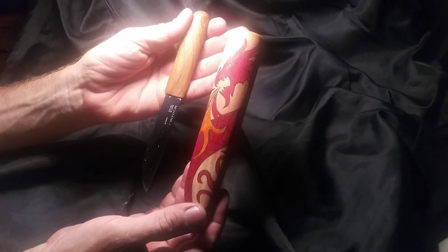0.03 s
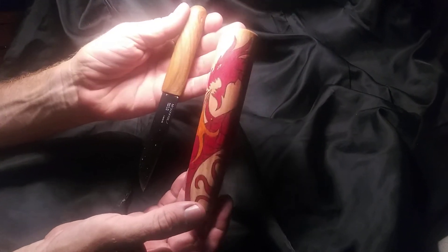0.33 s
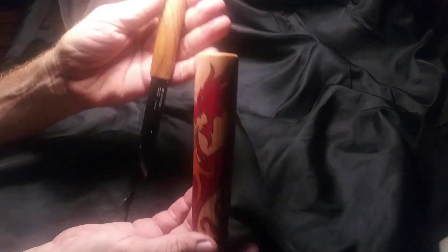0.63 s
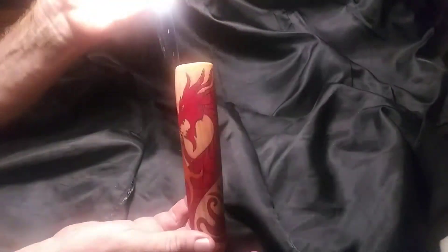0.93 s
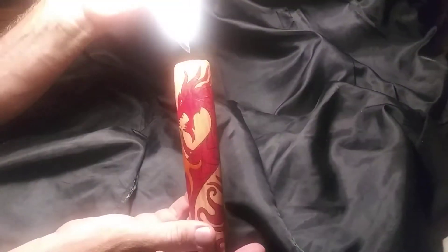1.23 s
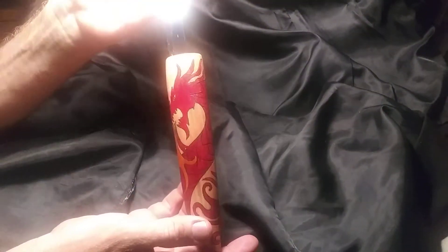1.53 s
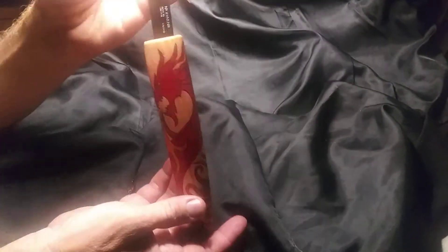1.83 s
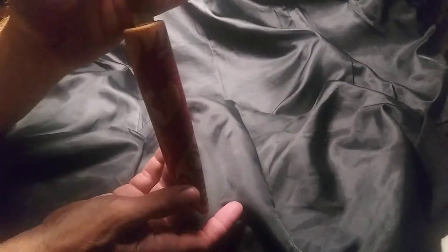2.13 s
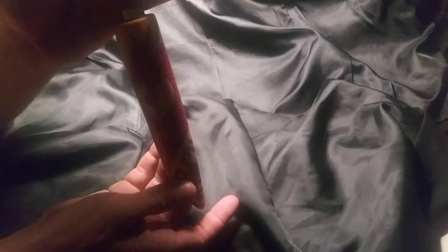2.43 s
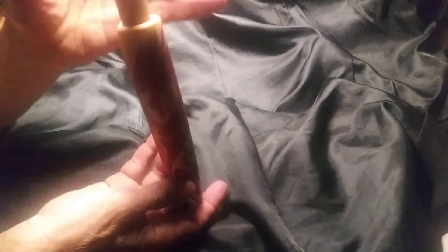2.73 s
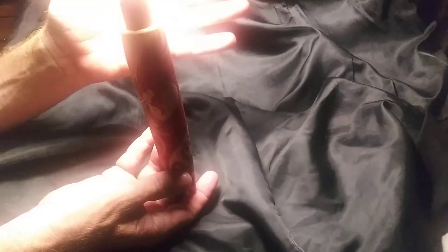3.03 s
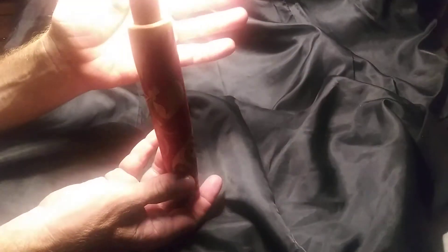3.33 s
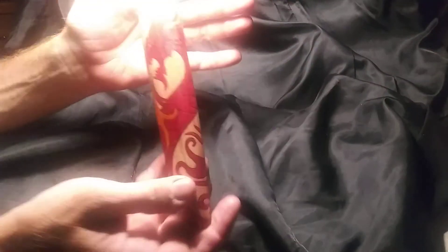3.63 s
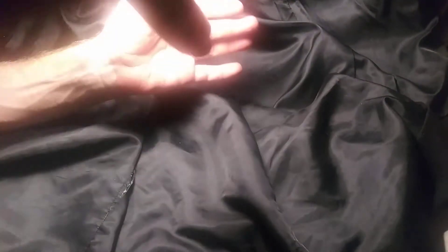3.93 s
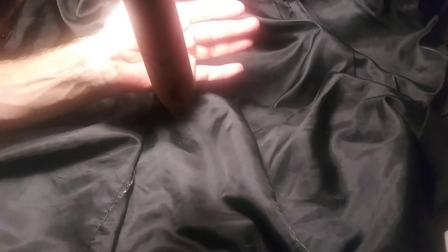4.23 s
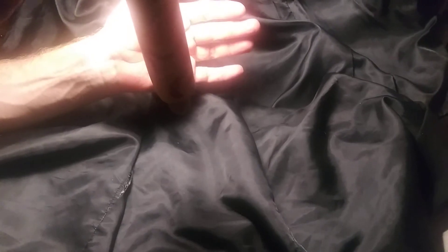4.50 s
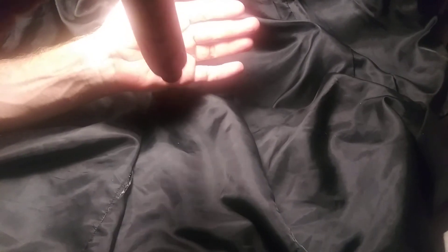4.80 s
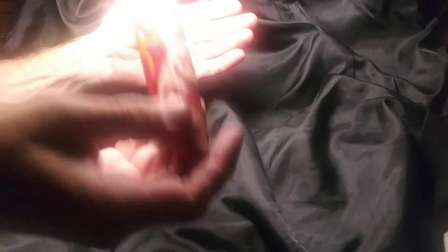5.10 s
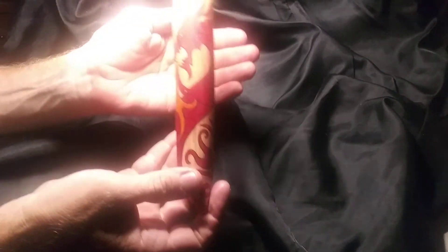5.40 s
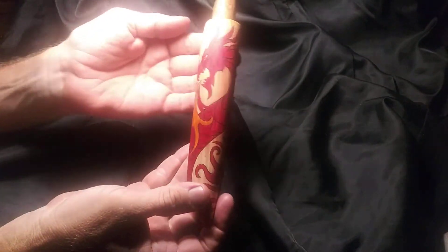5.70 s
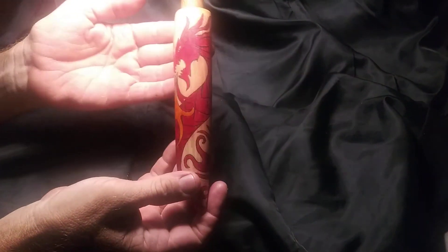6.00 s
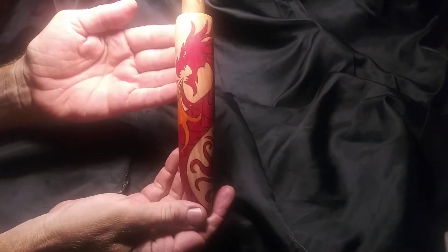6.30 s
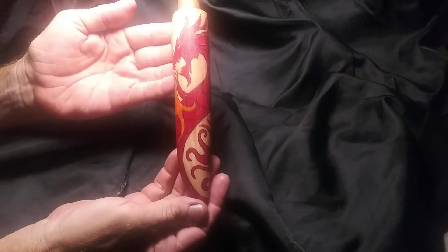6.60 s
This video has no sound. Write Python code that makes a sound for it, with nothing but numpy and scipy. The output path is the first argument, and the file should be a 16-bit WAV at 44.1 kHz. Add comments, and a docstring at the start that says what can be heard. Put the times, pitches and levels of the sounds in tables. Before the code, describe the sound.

Over a low electric hum, a blade ticks, rattles and clacks into a wooden sheath, followed by a faint skin squeak.

```python
"""A low electric hum fills a small room, with a few faint rubs and taps. A knife goes into a wooden sheath:
the blade ticks against the mouth, rattles down between the walls, and the handle seats with a loud clack.
Each knock is a few dying tones plus a crack of noise; each rub is noise gathered around a few pitches.
Later a hand shifts its grip, with a soft rustle and a faint rising squeak as skin sticks and slips."""
import sys
import numpy as np
from scipy import signal
from scipy.fft import rfft, irfft, next_fast_len
from scipy.io import wavfile
from scipy.ndimage import uniform_filter1d

SR = 44100
rng = np.random.default_rng(int(sys.argv[2]) if len(sys.argv) > 2 else 0)


def store_wav(level_fs):
    """Save 16-bit WAV to argv[1]."""
    pcm = np.round(np.clip(np.atleast_2d(level_fs), -1, 1) * 32767)
    wavfile.write(sys.argv[1], SR, pcm.T.astype(np.int16))


N = 297675
TIME = np.arange(N) / SR

# The hum of the mains and a motor. Each row: pitch in Hz, level in dB.
HUM_TONES = [(39.8, -72), (59.9, -55), (119.9, -60.5), (159.5, -66.5), (219.5, -86.5), (360, -91.5),
             (480, -92.5)]
# The tone colours of the rumble and the hiss. Each row: frequency in Hz, relative level in dB.
RUMBLE_COLOUR = [(15, -24), (30, -17), (50, -7.5), (75, 0), (105, 2), (135, 0), (175, -8), (205, -17.5),
                 (260, -24.5), (400, -40.5), (900, -80)]
HISS_COLOUR = [(100, -19.5), (250, -5), (400, -5), (800, -8.5), (1500, -10), (3000, -13), (7000, -16.5),
               (11000, -17.5), (13500, -16.5), (15500, -16.5)]
# Brief faint pitched sounds: small rubs, a light tap, a low bump, a knock's high after-ring.
# Each row: start and length in seconds, pitch and width in Hz, level in dB.
FAINT_SOUNDS = [(0.459, .045, 3020, 200, -77), (.475, 0.072, 5100, 250, -83), (.833, .04, 1267, 130, -66),
                (0.887, .03, 2000, 300, -76), (1.605, 0.046, 3100, 120, -78), (1.868, .14, 3490, 40, -76),
                (1.92, 0.24, 734, 200, -73.5), (1.939, 0.15, 5500, 700, -79),
                (2.011, 0.089, 6700, 400, -75.5), (2.027, 0.21, 3220, 150, -80),
                (2.877, 0.11, 1750, 700, -70), (3.742, .06, 6920, 700, -74), (4.108, .042, 333, 80, -73.5),
                (5.51, .06, 3250, 92, -81)]
# Knife meeting sheath. Each row: start in seconds, strength in dB, part struck, contact time in ms,
# bass cutoff in Hz, level in dB of the crack added to the ring.
KNOCKS = [ (1.6526, -38, "mouth", .8, 1340, -10), (1.689, -48, "mouth", 2.1, 1100, -22),
          (2.0185, -40.5, "mouth", 1.1, 300, -18.5), (2.0420, -47, "mouth", 1.8, 500, -47.5),
          (2.2841, -21, "hollow", 1.24, 480, -24), (2.6586, -26, "wall", 0.54, 430, -20.5),
          (2.6762, -23.5, "wall", 0.71, 363, -8.5), (2.6835, -26.5, "wall", 0.54, 710, -12),
          (2.693, -30, "wall", 1.8, 400, -6), (2.7006, -30, "wall", .45, 600, -10),
          (2.7256, -16.5, "blade", 0.77, 350, -9.5), (2.728, -19.5, "blade", 1.7, 500, -17),
          (2.7494, -37.5, "wall", .8, 594, -5.5), (2.7581, -24, "blade", 0.54, 500, -8),
          (2.7590, -24.5, "seat", .6, 330, -15), (2.7718, -22.5, "seat", 1, 377, -12),
          (2.7763, -16.5, "seat", 0.29, 600, -8), (2.7786, -2.5, "seat", 1.5, 340, -17.5)]
# The tones of each part: the sheath's rim ("mouth"), its thin side ("wall"), the half-empty sheath
# ("hollow"), the wedged steel ("blade"), and handle and sheath meeting as one ("seat").
# Each row: pitch in Hz, relative level in dB, seconds to fade by 60 dB.
PART_TONES = { "mouth": [(426, -8, 0.021), (640.7, -3, 0.026), (854, -6, 0.021), (1230, -3, 0.022),
              (1650, -4.5, 0.017), (2660, -17, 0.088), (3133, -4, 0.026), (3670, -23, 0.045),
              (6550, -14.5, 0.039)], "wall": [(480, -12, 0.037), (703, -5.5, .025), (1060, -11.5, 0.045),
              (1268, -9.5, 0.026), (1436, -3.5, 0.018), (1745, -5, 0.019), (2322, -16, 0.018),
              (2630, -17, 0.11), (3080, -0.5, .024), (3466, -15, .015), (4800, -23.5, 0.014),
              (5355, -20, 0.036), (6356, -19.5, 0.02), (7100, -20.5, .025)],
              "hollow": [(519.4, -24.5, 0.028), (953, -10.5, .035), (1037, -14, .04), (1350, -14, .03),
              (1695, -5, 0.033), (1907, 1, 0.01), (2040, -7, .012), (2560, -21, .12), (2850, -19.5, .07),
              (3080, -25.5, 0.083), (3830, -23, 0.089), (5250, -30, 0.066), (6433, -34, 0.068)],
              "blade": [(735, -8.5, 0.017), (1254, -17, 0.018), (1440, -14, 0.022), (2357.6, 0, .022),
              (2914, -14, .03), (3000, -9, 0.014), (3750, -11.5, 0.017), (4060, -18, .1),
              (4769, -15.5, 0.02), (5397, -24.5, 0.033), (7300, -21, 0.017)], "seat": [(490, -20.5, 0.014),
              (571.5, -16, 0.017), (1476, -8, 0.023), (1836, -0.5, 0.01598), (2221, -15.5, .02),
              (2900, -19.5, 0.02), (3320, -18, 0.011), (4014, -19, 0.008), (4470, -23, 0.022),
              (4888, -16.5, 0.01), (5624, -25.5, 0.011), (6860, -25.5, 0.014), (7500, -23, 0.014)]}
# The splintery crack of a knock, and the noise it sprays into the room.
# Each row: frequency in Hz, relative level in dB.
CRACK_COLOUR = [(150, -34), (265, -26), (320, 2), (500, -2.5), (1500, 8), (4000, -0.5), (7400, -8.5),
                (8500, -13), (11000, -21.5), (13000, -15.5), (16000, -19.5)]
SPRAY_COLOUR = [(150, -24), (260, -14.5), (320, 0.5), (480, -2), (1000, 0.5), (1600, 2.5), (2600, -1),
                (4000, -13), (7300, -16.5), (9000, -20.5), (16000, -25)]
# How bright a knock is. Each entry: part, treble cutoff in Hz when the crack is at PLAIN_CRACK_DB.
TREBLE_CUTOFF_HZ = {"mouth": 7300, "wall": 5300, "hollow": 8000, "blade": 7000, "seat": 12100}
PLAIN_CRACK_DB, CRACK_DB_PER_OCTAVE = -12, 12.5
# Rubbing strokes. Each row: start in seconds, seconds until it lets go, level in dB, kind of stroke.
STROKES = [ (2.287, 0.12, -60.5, "drag"), (2.654, .12, -45, "slide"), (5.265, 0.098, -70, "grip"),
           (5.43, .04, -67.5, "grip"), (5.462, 0.085, -65, "grip"), (5.561, 0.042, -62, "grip"),
           (5.697, 0.12, -62, "brush")]
# What each stroke stirs: steel on the mouth ("drag"), steel down the inside ("slide"), fingers creeping
# on wood ("grip"), the palm brushing off ("brush"). Each row: pitch and width in Hz, relative level in dB.
STROKE_PEAKS = { "drag": [(1170, 550, -10), (1750, 320, -9), (2447, 55, 7), (2640, 170, -19),
                (3760, 130, -10)], "slide": [(343, 45, 0), (500.6, 130, -5), (686.7, 55, 0),
                (1084.5, 211, -1.5), (1720, 190, 2), (2490, 410, -3.5), (3300, 330, -11.5),
                (5594, 1200, -23.5)], "grip": [(743, 61, -4.5), (884, 81, 5), (1080, 160, -14)],
                "brush": [(737, 110, 1), (1056, 90, -2.5), (1421, 120, 1), (1867, 120, -4),
                (2140, 150, -8.5), (2458, 94, 0), (3170, 146, -17), (6880, 1000, -25.5), (8500, 560, -29)]}
# Patches of squeaking skin. Each row: start and length in seconds, pitch as a multiple of the shared
# glide, level in dB, width in Hz.
SKIN_PATCHES = [(5.06, 0.411, 0.98, -74.5, 60.2), (5.17, .22, 1.14, -80, 70), (5.32, .13, .84, -82, 80.2),
                (5.428, .16, 1.02, -72, 240)]
# Echoes off nearby surfaces. Each row: delay in seconds, gain (a minus flips the wave).
NEAR_ECHOES = [(.0031, 0.12), (.0088, -0.072), (0.013, 0.042), (0.016, -.05), (.0215, 0.057)]
# How long the room rings. Each row: frequency in Hz, seconds to fade by 60 dB.
ROOM_FADE = [(250, .4), (700, .42), (1800, .41), (3500, .42), (7000, .46), (14000, .35)]
# The room's tone colour. Each row: frequency in Hz, relative level in dB.
ROOM_COLOUR = [(200, 0), (350, 2), (700, 1), (1800, 0), (3000, 0), (7000, 1), (14000, -1)]


def gain_of(db):
    """Turns decibels into a number to multiply by."""
    return 10 ** (np.asarray(db) / 20)


def evened(x):
    """Scales a signal to an average (rms) level of 1."""
    return x / np.sqrt(np.mean(x ** 2) + 1e-20)


def read(points, hz):
    """Reads between the rows of a frequency table, with octaves evenly spaced."""
    f, value = np.transpose(points)
    return np.interp(np.log(hz + 1), np.log(f + 1), value)


def add(mix, s, sound):
    """Mixes a sound in, starting at s seconds."""
    part = mix[round(s * SR):][:len(sound)]
    part += sound[:len(part)]


def noise(colour_db, size):
    """Noise of level 1, shaped by a function that gives dB for each frequency."""
    padded = next_fast_len(size, real=True)
    white = rfft(rng.standard_normal(padded))
    gains = gain_of(colour_db(np.fft.rfftfreq(padded, 1 / SR)))
    return evened(irfft(white * gains, padded)[:size])


def resonant_noise(peaks, size):
    """Noise gathered around peaks, each a pitch in Hz, a width in Hz and a level in dB."""
    def colour_db(f):
        return 20 * np.log10(sum(gain_of(db) / (1 + (2 * (f - hz) / width) ** 2)
                                 for hz, width, db in peaks))
    return noise(colour_db, size)


def drift(rate_hz):
    """A random wobble of typical size 1, mostly slower than rate_hz."""
    return noise(lambda f: -20 * np.log10(1 + (f / rate_hz) ** 4), N)


def background(hum_waver=0.045, rumble_db=-63, swell_db=1.55, hiss_db=-75):
    """The mains and a motor hum over a thin hiss and a rumble that swells and sinks by chance."""
    hum = sum(gain_of(db) * evened(np.sin(2 * np.pi * (hz * TIME + rng.random())))
              for hz, db in HUM_TONES)
    rumble = gain_of(rumble_db + swell_db * drift(rate_hz=1.4)) * noise(lambda f: read(RUMBLE_COLOUR, f), N)
    hiss = gain_of(hiss_db) * noise(lambda f: read(HISS_COLOUR, f), N)
    return hum * (1 + hum_waver * drift(rate_hz=2.6)) + rumble + hiss


def faint_sounds(skew=0.57):
    """Brief faint sounds, each a band of noise around one pitch that rises quickly and dies slowly."""
    out = np.zeros(N)
    for start, length, hz, width, db in FAINT_SOUNDS:
        size = round(length * SR)
        arch = np.sin(np.pi * np.linspace(0, 1, size) ** skew)  # a lower skew peaks earlier
        band = evened(resonant_noise([(hz, width, 0)], SR // 4)[:size])
        add(out, start, gain_of(db) * band * arch)
    return out


def knock(part, contact_ms, low_hz, high_hz, crack_db, room_db, crack_s=.003, spray_db=-1, tone_db=-5):
    """Tones swell while two parts press together, then ring out under a short crack."""
    t = np.arange(SR // 5) / SR
    contact = np.exp(-(t * 1000 / contact_ms) ** 2)
    hz, levels_db, fade_s = np.transpose(PART_TONES[part])[:, :, None]
    fades = gain_of(levels_db) * np.exp(-np.log(1000) * t / fade_s)
    swell = signal.fftconvolve(fades, contact[None] / contact.sum(), axes=1)[:, :len(t)]
    ring = (swell * np.sin(2 * np.pi * (hz * t + rng.random(hz.shape)))).sum(0)
    burst = (1 - contact) * np.exp(-t / crack_s)
    crack = burst * noise(lambda f: read(CRACK_COLOUR, f), len(t))
    spray = burst * noise(lambda f: read(SPRAY_COLOUR, f), len(t))
    near = ring + gain_of(crack_db) * crack
    # the room gathers the blow from all sides, which evens out its peaks
    spray *= np.linalg.norm(ring) / np.linalg.norm(spray)
    to_room = gain_of(room_db) * (gain_of(tone_db) * ring + gain_of(spray_db) * spray)
    # a light touch has no bass, a soft one no treble
    bass_cut = signal.butter(4, low_hz, "high", fs=SR, output="sos")
    treble_cut = signal.butter(3, min(high_hz, SR / 2 - 1), "low", fs=SR, output="sos")
    return signal.sosfilt(np.vstack([bass_cut, treble_cut]), [near, to_room])


def knife():
    """The knife knocks its way in. Gives the nearby sound and the share thrown into the room."""
    near, to_room = np.zeros((2, N))
    for start, db, part, contact_ms, low_hz, crack_db in KNOCKS:
        # a sharper contact both cracks more and reaches higher
        high_hz = TREBLE_CUTOFF_HZ[part] * 2 ** ((crack_db - PLAIN_CRACK_DB) / CRACK_DB_PER_OCTAVE)
        room_db = -33 - .52 * db  # light touches sound roomy, hard blows direct
        sound, thrown = gain_of(db) * knock(part, contact_ms, low_hz, high_hz, crack_db, room_db)
        add(near, start, sound)
        add(to_room, start, thrown)
    return near, to_room


def strokes(grain_db=3, build_s=0.021, release_db_per_s=420):
    """Blade or hand rubs on the wood: the pressure builds, holds, and lets go."""
    out = np.zeros(N)
    catch = evened(gain_of(grain_db * drift(rate_hz=90.12)))  # the surfaces catch and slip
    for start, length, db, kind in STROKES:
        age = TIME - start
        build = np.clip(age / build_s, 0, 1)
        release = gain_of(-release_db_per_s * np.maximum(age - length, 0))
        friction = np.resize(resonant_noise(STROKE_PEAKS[kind], SR), N)  # one second, looped
        out += gain_of(db) * build * release * catch * friction
    return out


def squeak(start_s=5.06, from_hz=4430, top_hz=6200, rise_s=.115, brake_s=5.5, sag_hz_per_s=2000):
    """Skin sticks and slips: the pitch climbs as the hand gathers speed and sags once it brakes."""
    lag = np.exp(-np.maximum(TIME - start_s, 0) / rise_s)
    glide_hz = top_hz - (top_hz - from_hz) * lag - sag_hz_per_s * np.maximum(TIME - brake_s, 0)
    pitch_hz = glide_hz * (1 + 0.0035 * drift(rate_hz=40))
    out = np.zeros(N)
    for start, length, ratio, db, width in SKIN_PATCHES:
        # random slips fray the pure tone into a narrow band
        slips = np.sqrt(width / (2 * np.pi * SR)) * uniform_filter1d(rng.standard_normal(N), size=40)
        flutter = 1 + 0.24 * drift(rate_hz=78)
        tone = evened(np.sin(2 * np.pi * np.cumsum(ratio * pitch_hz / SR + slips)) * flutter)
        fade = signal.windows.tukey(round(length * SR), 0.39)
        add(out, start, gain_of(db) * tone[round(start * SR):][:len(fade)] * fade)
    return out


def near_surfaces(x, scatter_db=-21, fade_s=.09):
    """Things close by add single echoes and a quick scatter to the sound."""
    t = np.arange(SR // 4) / SR
    build = 1 - np.exp(-(t / 0.0057) ** 2)
    scatter = rng.standard_normal(len(t)) * build * np.exp(-np.log(1000) * t / fade_s)
    response = gain_of(scatter_db) * scatter / np.linalg.norm(scatter)
    for delay, gain in NEAR_ECHOES:
        add(response, delay, np.array([gain]))
    return x + signal.fftconvolve(x, response)[:N]


def room(x, build_s=.018):
    """The far walls answer late, each band of frequencies dying at its own speed."""
    t = np.arange(SR) / SR
    wash = noise(lambda f: read(ROOM_COLOUR, f), SR)
    hz, age, bands = signal.stft(wash, SR, nperseg=256)
    bands *= np.exp(-np.log(1000) * age / read(ROOM_FADE, hz)[:, None])
    build = 1 - np.exp(-(t / build_s) ** 2)
    tail = signal.istft(bands, SR, nperseg=256)[1][:SR] * build
    return signal.fftconvolve(x, tail / np.linalg.norm(tail))[:N]


def scene():
    """Knife and hand in the room, over the hum, in one channel."""
    knocks, to_room = knife()
    steady = background()
    near = knocks + squeak() + faint_sounds() + strokes()
    return (steady + near_surfaces(near) + room(to_room))[None]


def record(dry):
    """Fades the sound in over 8 ms and cuts the very highest treble."""
    faded_in = dry * np.minimum(TIME / .008, 1)
    treble_cut = signal.firwin(511, cutoff=15720, window=("kaiser", 9), fs=SR)
    return signal.oaconvolve(faded_in, treble_cut[None], "same")


dry = scene()
out = record(dry)
store_wav(out)
```